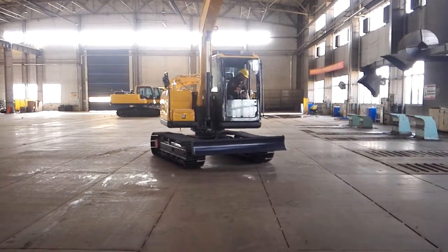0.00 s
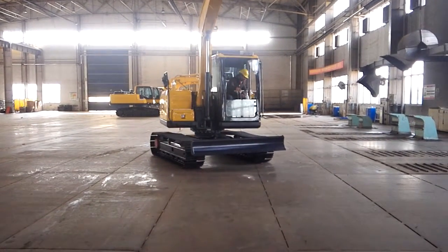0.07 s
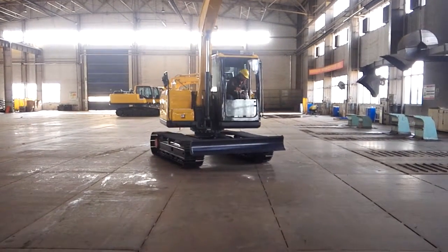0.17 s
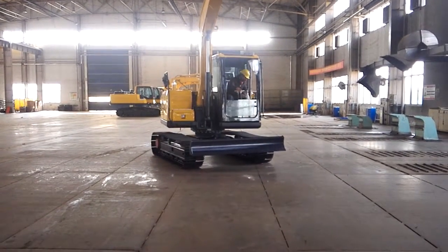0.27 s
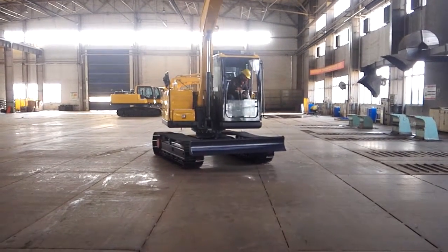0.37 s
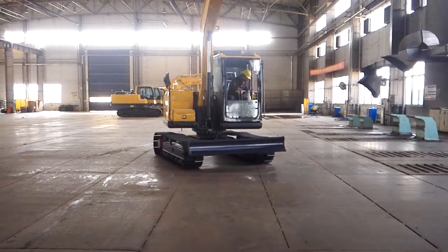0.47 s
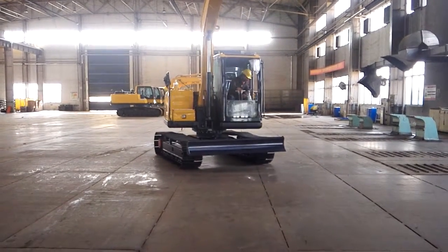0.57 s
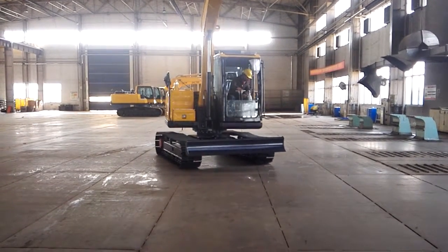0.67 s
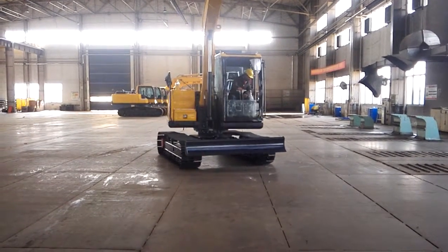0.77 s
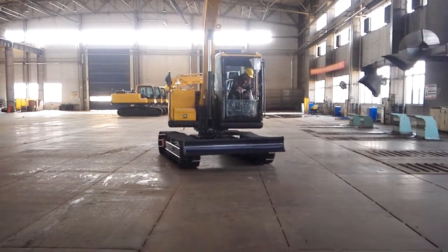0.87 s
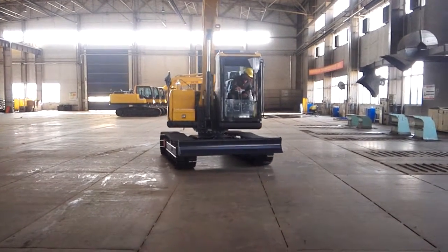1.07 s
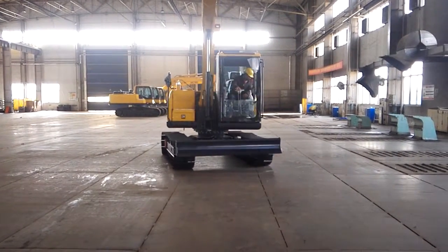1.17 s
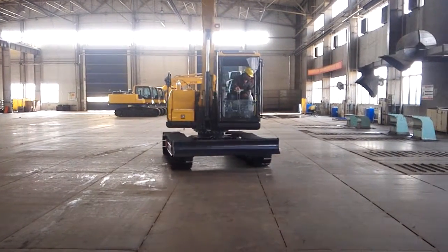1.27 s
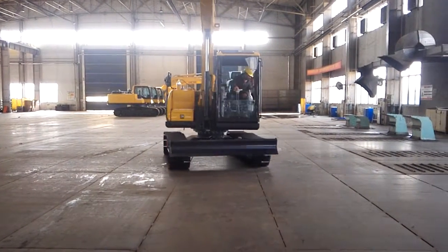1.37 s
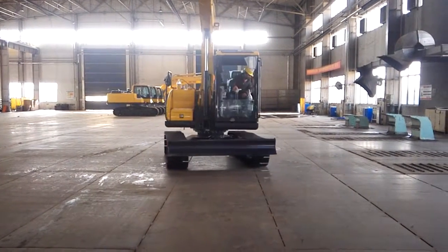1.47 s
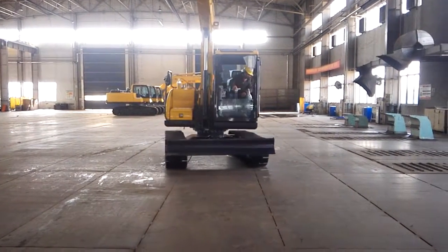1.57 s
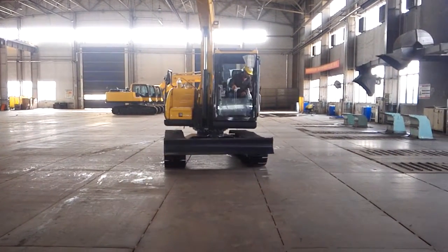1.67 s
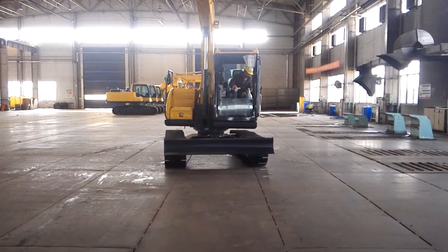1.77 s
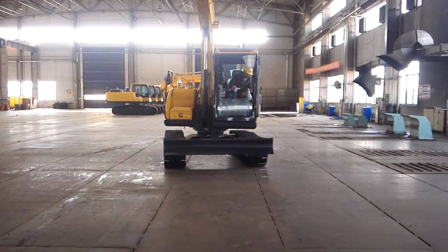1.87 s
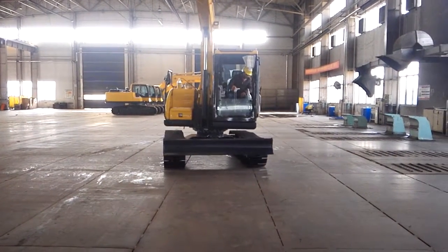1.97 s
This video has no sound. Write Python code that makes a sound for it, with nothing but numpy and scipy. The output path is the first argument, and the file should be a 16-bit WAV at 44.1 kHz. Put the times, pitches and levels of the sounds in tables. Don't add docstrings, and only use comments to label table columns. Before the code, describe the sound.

Steel track shoes of a small excavator slip and slap on concrete in rapid, irregular rasping bursts with clanks and tiny pin rings, then stop; the large hall rings on over a fading engine, clipped camera microphone.

```python
import sys
import numpy as np
from scipy import signal
from scipy.fft import rfft, irfft, next_fast_len
from scipy.io import wavfile
from scipy.ndimage import map_coordinates

SR = 44100
rng = np.random.default_rng(int(sys.argv[2]) if len(sys.argv) > 2 else 0)


def wav_out(sig):
    wavfile.write(sys.argv[1], SR, np.round(np.clip(np.atleast_2d(sig).T, -1, 1) * 32767).astype(np.int16))


def volts_from_decibels(level):
    exponent = np.asarray(level, float) / 20
    return 10 ** exponent


N = 88200
TIME_S = np.arange(N) / SR


def unit(x):
    return x / np.sqrt(np.mean(x ** 2) + 1e-20)


def along(points, hz):
    point_hz, value = np.transpose(points)
    return np.interp(np.log(hz + 1), np.log(point_hz + 1), value)


def wobble(rate_hz):
    knots = rng.standard_normal(int(N * rate_hz / SR) + 4)
    return map_coordinates(knots, [np.arange(N) * rate_hz / SR])


def filtered(x, response):
    size = next_fast_len(N + SR // 2)
    hz = np.fft.rfftfreq(size, 1 / SR)
    return irfft(rfft(x, size) * response(hz), size)[..., :N]


# hz, likeness (1 = identical)
LIKENESS = [(60, .985), (200, .975), (350, .7), (700, .4), (1400, .2), (2500, 0), (13000, .2)]
# hz, left_minus_right_db
PORT_LEAN = [(60, 0.5), (180, -1), (520, 0), (1550, 1.5), (4590, 0), (13600, -5)]


def paired(two):
    def mid_and_side(hz):
        angle = np.arccos(np.clip(along(LIKENESS, hz), -1, 1)) / 2
        return np.array([np.cos(angle), np.sin(angle)])

    mid, side = filtered(two, mid_and_side)
    ports = np.array([mid + side, mid - side])
    return filtered(ports, lambda hz: volts_from_decibels(along(PORT_LEAN, hz) * [[.5], [-.5]]))


def rush(spectrum):
    noise = paired(rng.standard_normal((2, N)))
    return unit(filtered(noise, lambda hz: volts_from_decibels(along(spectrum, hz))))


# centre_hz, width_hz, gain_db over the rest
SHOE_MODES = [(710, 310, 5), (1100, 200, 0.5), (2120, 256, 3.5), (3570, 500, 2), (5150, 117, 2),
              (6000, 900, 2.5)]


def shoes(hz):
    response = 1
    for centre, width, db in SHOE_MODES:
        peak = 1j * hz * width / (centre * centre - hz * hz + 1j * hz * width)
        response = response + (volts_from_decibels(db) - 1) * peak
    return response


LAG_S, LAG_POWER = .013, 1.15


def through_steel(hz):
    lag = LAG_S * (1000 / np.maximum(hz, 300)) ** LAG_POWER
    phase = 2 * np.pi * np.cumsum(lag) * hz[1]
    return shoes(hz) * np.exp(-1j * phase)


def stroke(start_s, hold_s, t60_s):
    t = TIME_S - start_s
    return np.clip(t / .001, 0, 1) * volts_from_decibels(-60 * np.clip(t - hold_s, 0, 1) / t60_s)


# start_s, level_db, length_s,
# bite_db (bright first bite over the rasp)
TRACK_SLIPS = [(.165, -27.5, .03, -5), (.188, -21, 0.1, -9), (.239, 4, 0.021, -3.5), (.269, -7.5, .02, -18),
               (.320, -1.5, .034, -4), (.387, -10.5, 0.023, -13.5), (.429, 9.5, 0.026, 4.5),
               (.464, -2, 0.0064, -11), (.490, -5, 0.038, -16), (.535, -7.5, 0.026, -8),
               (.651, -3.5, 0.033, 4), (.685, -0.5, 0.038, -4), (.733, -12, 0.058, -5),
               (.801, -1.5, 0.033, 0.5), (.844, 5, 0.028, 2), (.884, -13, .013, -3.5),
               (.948, -10, 0.037, -13), (1.005, -16, 0.011, -10), (1.107, -8.5, 0.032, 1.5),
               (1.148, -2.5, 0.034, -2.5), (1.184, -9, 0.031, -1), (1.255, -9.5, 0.036, -1),
               (1.308, -11, .028, -11), (1.349, -20.5, 0.057, -8),
               (1.507, -22.5, .045, -6),
]
# hz, level_db per Hz
RASP_SPECTRUM = [(290, -28), (500, -12), (792, -7.5), (936, -12), (1090, -3), (2940, -2.5), (4850, -1),
                 (8970, -12), (14000, -33)]
# hz, level_db
BITE_SPECTRUM = [(1500, -25), (4000, -13), (8000, 0.5), (11000, -21), (14000, -24.5), (16000, -85)]
BITE_T60_S, RELEASE_T60_S = 0.053, 0.098
TRACKS_DB, GRIT_DB = -12, 1


def tracks():
    rasp, bite, steel = rush(RASP_SPECTRUM), rush(BITE_SPECTRUM), 0

    def path(hz):
        return through_steel(hz) / (1 + (hz / 14500) ** 20)

    for start, db, length, bite_db in TRACK_SLIPS:
        grains = stroke(start, .2, .01) * rasp
        grains = grains + volts_from_decibels(bite_db) * stroke(start, 0, BITE_T60_S) * bite
        release = volts_from_decibels(-60 * np.clip(TIME_S - start - length, 0, 1) / RELEASE_T60_S)
        steel = steel + volts_from_decibels(db) * release * filtered(grains, path)
        rasp, bite = np.roll(rasp, 9973, axis=1), np.roll(bite, 9973, axis=1)
    return volts_from_decibels(TRACKS_DB) * steel * unit(volts_from_decibels(GRIT_DB * wobble(300)))


# start_s, level_db, pitch_hz of the clank
SHOE_BLOWS = [(.240, -15, 606), (.325, -24, 870), (.430, -9, 710), (.480, -20.5, 706), (.545, -34, 700),
              (.687, -15, 1000), (.805, -23, 1100), (.846, -10, 820), (1.005, -22.5, 785),
              (1.149, -10.5, 960), (1.311, -37, 857)]
REBOUND_S, CLANK_OCTAVES, CLANK_DB = 0.0048, 1, 26.5


def clanks():
    out = 0
    rebound = np.arange(6)
    for start, db, pitch in SHOE_BLOWS:
        chance = rng.uniform(-1.085, 1, (2, 6))
        when = start + REBOUND_S * rebound * (1 + 0.34 * chance)
        taps = np.zeros((2, N))
        taps[[[0], [1]], (when * SR).astype(int)] = volts_from_decibels(db + CLANK_DB) * (-1) ** rebound

        def path(hz):
            band = np.exp(-(np.log2((hz + 1) / pitch) / CLANK_OCTAVES) ** 2)
            return band * through_steel(hz)

        out = out + filtered(taps, path)
    return paired(out)


# start_s, level_db, pitch_hz
PIN_RINGS = [
    (.342, -12, 5980),
    (.447, 2, 5000),
    (.455, 0.5, 5670),
    (.670, -14.5, 6000),
    (.689, -10.5, 7100),
    (.718, -17, 5100),
    (.856, -2.5, 6540),
    (.865, -20, 4540),
    (1.112, -13, 5150),
    (1.312, -17.5, 5110),
]
PIN_T60_S, PIN_RISE_S = .05, .0015


def pins():
    out = 0
    for start, db, hz in PIN_RINGS:
        phase = rng.uniform(0, 2.5, (2, 1))
        t = np.clip(TIME_S - start, 0, 2)
        shape = volts_from_decibels(db - 60 * t / PIN_T60_S) * (1 - np.exp(-t / PIN_RISE_S))
        out = out + shape * np.sin(2 * np.pi * hz * t + phase)
    return out


# start_s, level_db, pitch_hz
FLOOR_THUDS = [(0.189, -30, 124), (0.255, -21.5, 140), (0.335, -21, 142), (0.444, -25.5, 195),
               (0.53, -28.5, 114), (0.689, -20, 154), (0.809, -19.5, 131), (0.852, -25.5, 229),
               (1.128, -25, 129), (1.168, -26, 209.7), (1.299, -31, 126), (1.397, -33.5, 116),
               (1.519, -32.5, 246)]
THUD_DB, THUD_NOISE_DB = 1, -4
THUD_RISE_S, THUD_T60_S = 0.006, 0.14


def slab():
    boom, swell = 0, 0
    for start, db, hz in FLOOR_THUDS:
        t = np.clip(TIME_S - start, 0, 2)
        shape = volts_from_decibels(db + THUD_DB - 60 * t / THUD_T60_S) * (1 - np.exp(-t / THUD_RISE_S))
        boom = boom + shape * np.sin(2 * np.pi * hz * t)
        swell = swell + shape
    rumble = rush([(50, -15), (130, -2), (260, 2), (600, -26), (2000, -72.5)])
    return boom + volts_from_decibels(THUD_NOISE_DB) * swell * rumble


# hz, t60_s
HALL_T60 = [(150, 2.1), (1000, 5), (3000, 2.02), (6000, 1.21), (9000, 0.93), (13000, 0.89)]
HALL_DB, HALL_DELAY_S = -10.5, 0.022
NEAR_DB, NEAR_T60_S = -11, 0.34


def hall(x):
    hz, t, noise = signal.stft(rng.standard_normal((2, 2, N)), SR, nperseg=256)
    t60 = along(HALL_T60, hz)[:, None]
    far = volts_from_decibels(-60 * t / t60)
    near = volts_from_decibels(-60 * t / np.minimum(t60, NEAR_T60_S))
    decay = np.array([far, near])[:, None]
    tails = signal.istft(noise * decay, SR, nperseg=256)[1][..., :N]
    energy = np.linalg.norm(tails[:, :1], axis=2, keepdims=True)
    tails = tails * volts_from_decibels([HALL_DB, NEAR_DB])[:, None, None] / energy
    tail = paired(tails.sum(axis=0)) * np.clip(TIME_S / HALL_DELAY_S, 0, 1)
    return signal.fftconvolve(x.mean(axis=0)[None] * 2 ** .5, tail, axes=1)[:, :N]


# time_s, level_db
ENGINE_LEVEL = [
    (0.0, -34),
    (0.17, -34),
    (0.41, -32),
    (0.68, -31.5),
    (0.86, -36),
    (1.38, -41.5),
    (1.74, -42.5),
    (2.0, -44.5),
]
# hz, level_db per Hz
DRONE_SPECTRUM = [(15, -43.5), (42, -11.5), (64, -14), (130, -6.5), (600, -11), (1750, -14.5),
                  (2400, -22.5), (9000, -38.5)]
DRONE_DB, SWAY_DB = 3, .8
FIRING_HZ, FIRING_DEPTH = 44.64, 0.1


def engine():
    time, db = np.transpose(ENGINE_LEVEL)
    firing_hz = FIRING_HZ * (1 + 0.045 * wobble(3.36))
    throb = 1 + FIRING_DEPTH * np.sin(2 * np.pi * np.cumsum(firing_hz) / SR)
    level = volts_from_decibels(np.interp(TIME_S, time, db) + DRONE_DB + SWAY_DB * wobble(8.8))
    return level * throb * rush(DRONE_SPECTRUM + [(14000, -68), (16000, -120)])


def scene():
    machine = tracks() + pins() + slab()
    clank = clanks()
    hall_feed = machine + volts_from_decibels(-4.5) * clank
    return machine + clank + hall(hall_feed) + engine()


def low_pass(x):
    return signal.sosfilt(signal.butter(12, 14160, fs=SR, output="sos"), x)


LOW_CUT_HZ = 30
CLIP_TOP, CLIP_HARD = 0.78, 18


def record(dry):
    x = filtered(dry, lambda hz: 1j * hz / (LOW_CUT_HZ + 1j * hz))
    x = x / (1 + np.abs(x / CLIP_TOP) ** CLIP_HARD) ** (1 / CLIP_HARD)
    return low_pass(x)


dry = scene()
out = record(dry)
wav_out(out)
```